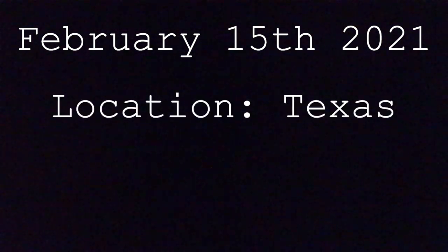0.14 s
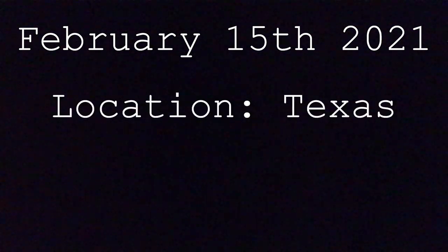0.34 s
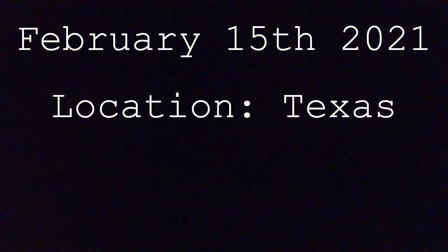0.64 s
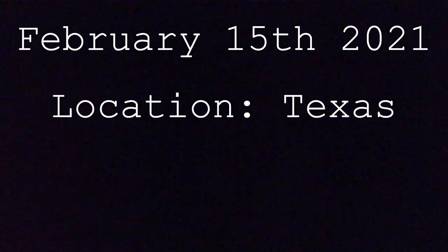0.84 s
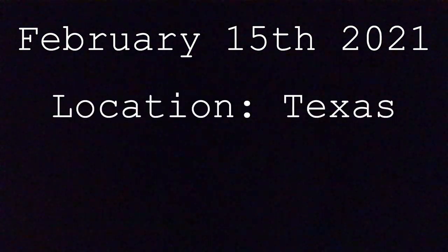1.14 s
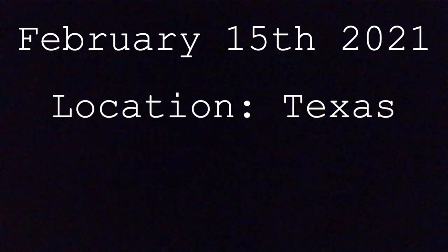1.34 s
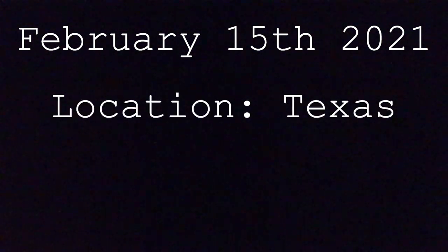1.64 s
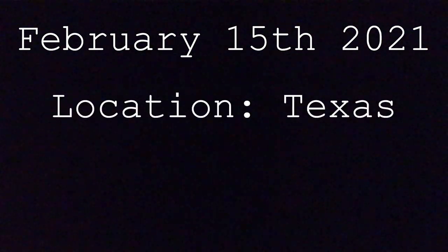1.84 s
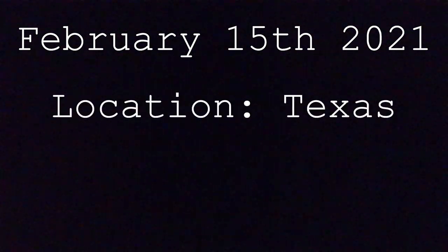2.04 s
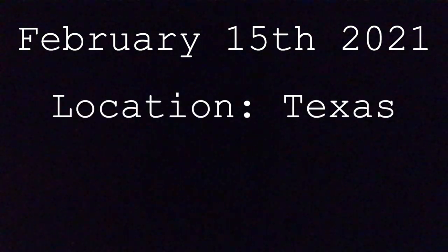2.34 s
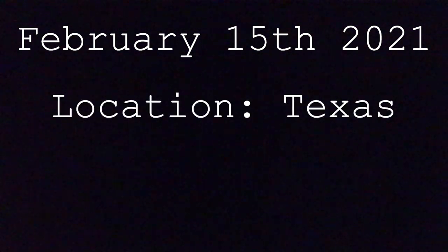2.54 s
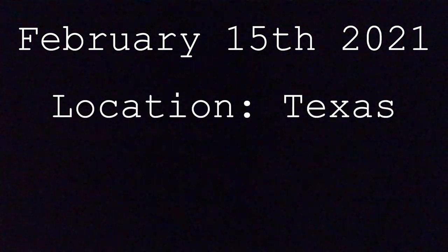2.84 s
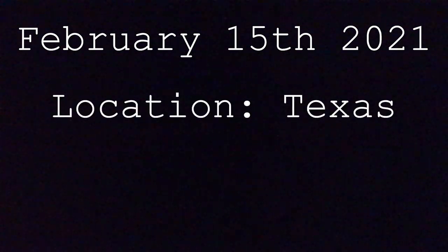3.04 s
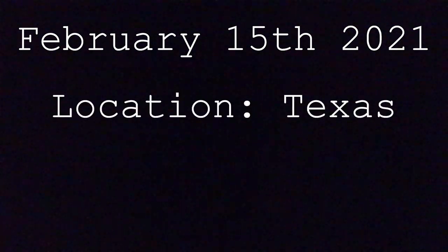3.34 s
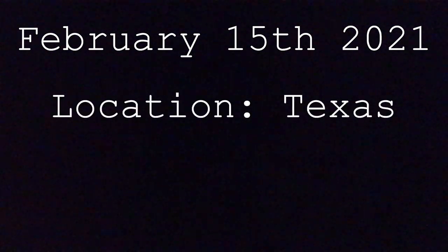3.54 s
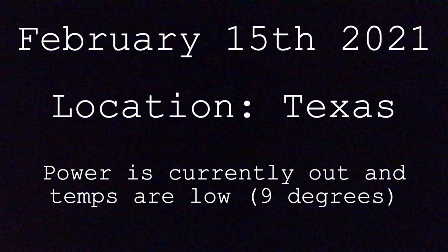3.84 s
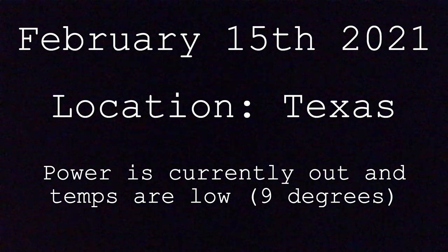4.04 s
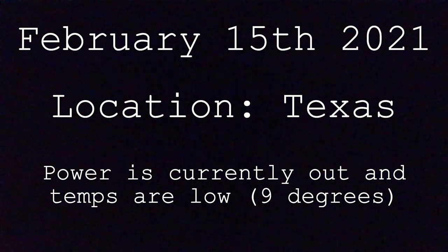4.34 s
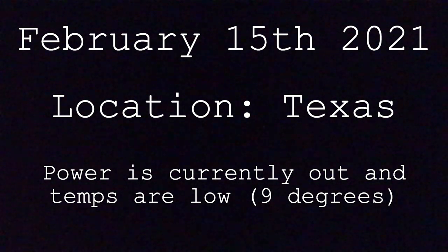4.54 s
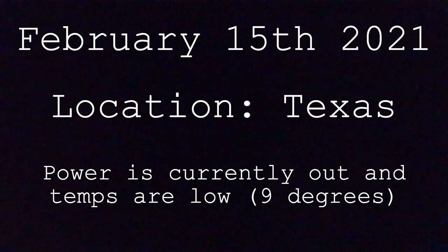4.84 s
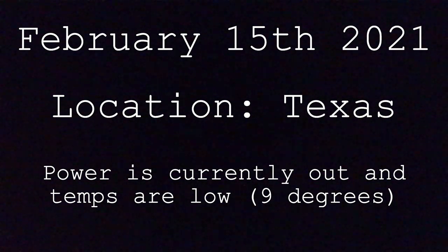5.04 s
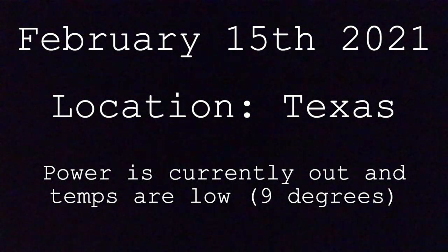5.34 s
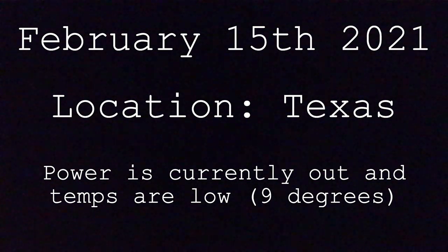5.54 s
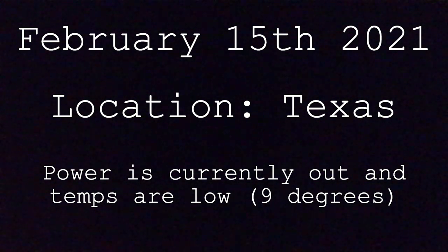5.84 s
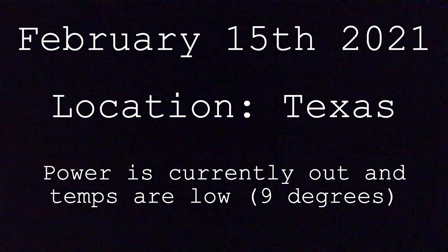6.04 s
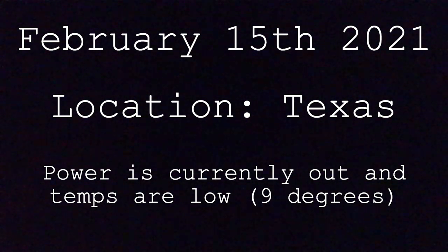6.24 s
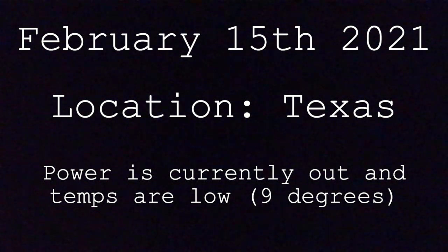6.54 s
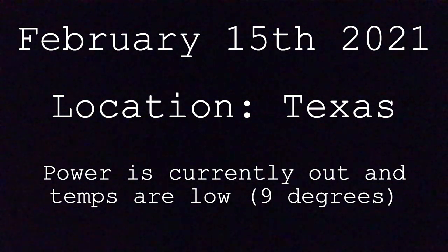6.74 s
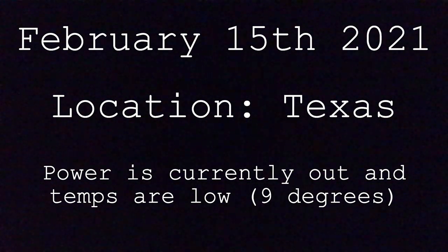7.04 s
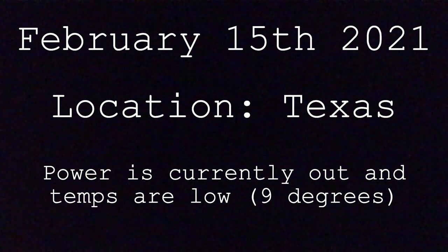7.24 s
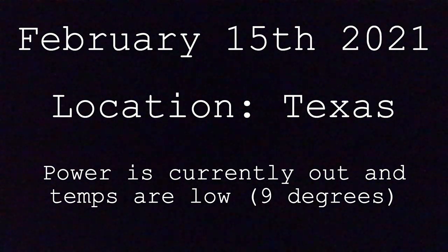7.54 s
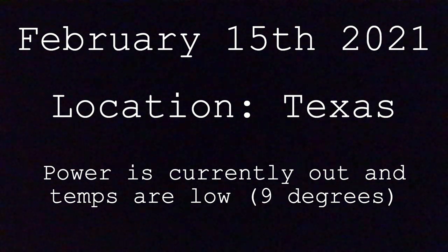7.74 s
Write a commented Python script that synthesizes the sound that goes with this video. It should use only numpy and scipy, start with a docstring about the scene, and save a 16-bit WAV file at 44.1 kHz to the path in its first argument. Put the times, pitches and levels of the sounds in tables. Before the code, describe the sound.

Something drops onto a tabletop, faint rustling and taps follow, then a match rasps four times on its box, ending with a loud knock.

```python
"""In a small quiet room something lands on a table with a thud, and a cardboard matchbox is handled.
A match is struck four times: crowds of tiny noise impacts make the head rasp and ring the box,
then the loose sticks rattle inside as sparser, more uneven crowds. Single taps are short rings of the box.
Shaped noise gives the soft rustle of hands and the faint hiss, and a diffuse echo gives the room."""
import sys
import numpy as np
from scipy import signal
from scipy.fft import rfft, irfft
from scipy.io import wavfile
from scipy.ndimage import uniform_filter1d

SR = 44100
rng = np.random.default_rng(int(sys.argv[2]) if len(sys.argv) > 2 else 0)


def materialize(psi):
    """Save the field psi as 16-bit PCM at rate SR to the path in sys.argv[1].

    A 1-D psi becomes a single channel; in a 2-D psi each row is a channel.
    """
    bounded = np.clip(np.atleast_2d(psi).T, -1, 1)
    quanta = np.round(bounded * 32767).astype(np.int16)
    wavfile.write(sys.argv[1], SR, quanta)


N = 347949
SIZE = 16384  # longest single event [samples]
FREQ = np.maximum(np.arange(SIZE // 2 + 1) * SR / SIZE, 1)  # [Hz]
TIME = np.arange(N) / SR  # [s]
TOP_HZ = 16000  # upper limit of the recorder

# colour of still air and microphone hiss, scaled later to one overall level:
# (frequency [Hz], relative level [dB])
HISS_COLOUR = [(20, -39.5), (35, -9), (55, 0.5), (110, -8), (230, -8.5), (450, -12.5), (680, -16),
               (1000, -17), (2000, -24.5), (4900, -29.5), (6200, -28.5), (10500, -36.5), (12000, -32),
               (16000, -32)]
HISS_DB = -67
# how long the room echo takes to fall by 60 dB: (frequency [Hz], decay time [s])
ROOM_DECAY = [(100, 0.12), (300, 0.6932), (1000, 0.1482), (3000, 0.29), (7000, 0.32), (15000, 0.23)]
# colour of the room echo: (frequency [Hz], relative level [dB])
ROOM_COLOUR = [(60, -0.5), (300, -9), (800, -0.5), (1600, 5), (4000, -2.5), (8000, -3), (15000, 0)]

# hands and sleeves brushing; a positive tilt lifts the bright part and lowers the dull part:
# (crest time [s], rise [s], fall [s], level [dB], tilt [dB])
BRUSHES = [(.06, .024, 0.043, -53.5, 4.5), (.1, 0.14, 0.09, -56.5, -1), (.94, .03, .025, -66.5, 1),
           (1.33, .12, 0.089, -66.5, -4.5), (1.425, 0.038, 0.086, -56, -2.5),
           (1.74, 0.094, 0.08, -59.5, 1.9), (1.96, 0.056, 0.049, -61.5, 1), (2.22, 0.063, 0.063, -60, 0.5),
           (4.43, .06, .07, -73.5, 5.5), (7.76, 0.036, .03, -68.5, -8)]
# colour of sliding skin and cloth: (frequency [Hz], relative level [dB])
CLOTH_COLOUR = [(150, -11.5), (400, -1), (700, -5.5), (1100, 2), (1700, -5), (2800, -11), (4000, -8.5),
                (5000, -12.5), (6200, -10), (10500, -19.5), (15000, -14.5)]
# a trace of cloth noise remains while the hands rest
RESTING_DB, RESTING_TILT_DB = -82.5, 1
# the sleeve swishes dully as the arm starts each stroke
SWISH_RISE_S, SWISH_FALL_S, SWISH_DB, SWISH_TILT_DB = 0.018, .03, -68, -8

# low bumps of handling: (middle time [s], length [s], level [dB], frequency [Hz])
HANDLING_BUMPS = [(.938, .058, -41.5, 136), (1.362, .026, -48.5, 105), (5.458, .035, -56, 55),
                  (7.8065, .0066, -14, 305), (7.812, 0.022, -23.5, 109), (7.837, .017, -34, 140)]
# the table top flexes slowly under every blow; its level is relative to the blow
FLEX_LAG_S, FLEX_LENGTH_S, FLEX_DB, FLEX_HZ = .009, .026, -19.5, 129
# the jerk of the hand gives a low push; its level is relative to the settling sticks
PUSH_LENGTH_S, PUSH_OVER_SETTLE_DB, PUSH_HZ = .033, -16, 70

# an object lands on the table, rocks and bounces: (time [s], level [dB], tilt [dB per octave])
THUDS = [(.6503, 1, -2.5), (0.6536, -9, -2.5), (.6615, -12, -5), (.682, -17, -2), (0.7015, -8.5, -5),
         (.719, -14, -4.5), (0.7777, -18, -5.5), (0.7899, -27, -6)]
# resonances of the table top: (frequency [Hz], width [Hz], lift over the broad colour [dB])
TABLE_MODES = [(253, 16, 3.5), (313, 7, 9.9), (413.5, 11, 4.06), (470.4, 12, 3), (620, 61, 8.6),
               (950, 40, 8), (1400, 90, 6)]
# broad colour of a blow on the table: (frequency [Hz], relative level [dB])
WOOD_COLOUR = [(30, -37.5), (80, -23.5), (140, -5.5), (300, -4), (480, -2.5), (780, -19), (1200, -18),
               (2000, -27), (3000, -28.5), (5500, -34), (8000, -40), (15500, -50)]
THUD_HZ, THUD_RING_DB, THUD_ROOM_DB = 335, 4, -15

# single taps of a stick or nail on the box:
# (time [s], level [dB], wall ring [Hz], ring lift [dB], tilt [dB per octave])
TICKS = [(1.6165, -43.5, 1502, 10, -3), (1.7545, -43.5, 1000, 7.5, -2), (2.679, -37.5, 2790, 3, 0.5),
         (2.7173, -34.5, 1300, 6.5, 1.5), (2.7337, -47, 1400, 9, 0), (3.0241, -23, 1500, 4.5, 2),
         (3.029, -19.5, 750, 4.5, 2.5), (3.0995, -38, 1600, 7, -3.5), (4.7063, -32.5, 2300, 4.5, 2),
         (4.8883, -43, 986, 6, 2), (5.0046, -33.5, 2600, 5, 1), (5.0249, -22, 1080, 5, -1.5),
         (5.3704, -12, 1690, 5, -6), (5.4075, -29, 1500, 5, 6.5), (5.4618, -30.5, 950, 5, -5),
         (5.468, -31.5, 950, 14, 3.5), (5.5143, -30, 1100, 4, 8), (5.528, -30.5, 1150, 5, -3.5),
         (5.5517, -25, 1710, 13, -1), (5.5633, -19, 5200, 6.5, 5.5), (5.581, -38, 1117, 10, -7.5),
         (5.9245, -40.5, 2700, 5, 3), (6.2099, -19, 1500, 7.5, -2.5), (6.2705, -30.5, 900, 3.5, -4.5),
         (6.3186, -27.5, 1006, 4, 1.5), (6.4155, -30.5, 1000, 7, -3), (6.426, -31.5, 1500, 11, -1.5),
         (6.438, -33.5, 1000, 3, -4), (6.5395, -31, 641, 15, 4), (6.818, -34.5, 1880, 15, 1.5),
         (7.146, -18, 950, 6.5, 0), (7.178, -11.5, 4500, 23, -1), (7.1894, -18.5, 950, 11, 2.5),
         (7.2093, -27.5, 950, 24.5, -3.5), (7.3377, -22.5, 698, 12, 6), (7.3395, -30, 700, 4, -4.5),
         (7.6303, -30.5, 1006, 4, 3.5), (7.6583, -45.5, 1000, 8, -1), (7.6855, -45, 1900, 3, 1),
         (7.8298, 0, 1200, 20.5, 7.5)]
# resonances of the cardboard box, before the fingers shift them:
# (frequency [Hz], width [Hz], lift over the broad colour [dB])
BOX_MODES = [(640, 96, 7), (927, 59, 8), (1193, 160, 4.5), (1600, 200, 2.5), (1715, 46, 7), (2300, 64, -1),
             (2740, 270, 2.5), (3420, 120, -1), (4230, 610, 5), (4694, 40, 0.5), (5920, 400, 7.5),
             (6780, 280, 5)]
# broad colour of a tap on the box: (frequency [Hz], relative level [dB])
TAP_COLOUR = [(50, -16), (250, -18), (500, -4.5), (1000, 0.5), (1800, -2.5), (3000, -5.5), (5000, -15),
              (7500, -21), (10500, -29), (15500, -27.5)]
TAP_ROOM_DB = -15

# fingers scuff the box and a few sticks slide inside:
# (crest time [s], fall [s], level [dB], wall ring [Hz], tilt [dB per octave])
SCUFFS = [(.642, 0.0083, -42, 600, -14), (.679, 0.035, -42, 1100, -3), (1.32, .01, -59, 520, -14),
          (1.355, 0.0057, -41.5, 900, -6.5), (1.374, 0.017, -34.5, 1540, 0),
          (1.79, 0.0076, -57.5, 1200, -2), (1.865, 0.0053, -58, 484, -6), (1.975, 0.0077, -59.5, 555, -7),
          (2.083, .006, -56.5, 498, -7), (2.338, .004, -61.5, 1100, -4), (2.961, .006, -54, 900, 1),
          (2.995, 0.032, -50, 1100, -1.5), (3.06, .009, -55, 800, 0), (3.155, .012, -64, 900, -0.5),
          (4.455, .022, -66, 900, -3), (4.481, 0.0028, -47, 1100, -5.5), (4.8, .012, -67.5, 800, 0),
          (4.845, .008, -61.5, 600, -8), (5.299, .012, -53.5, 1097, -3.5), (5.52, .046, -49.5, 950, -0.5),
          (5.601, .003, -46.5, 980, 2), (5.666, .005, -60, 895, -5), (5.933, .015, -44, 1027, -4),
          (6.333, 0.027, -51.5, 950, -1), (6.417, 0.0035, -44.5, 1900, -4), (6.821, 0.0068, -44, 1026, -3),
          (7.159, .006, -35.5, 880, -2.5), (7.197, 0.021, -39, 920, -2), (7.641, .013, -44.5, 980, -4),
          (7.724, 0.0056, -61, 1700, 0), (7.789, 0.0093, -30.5, 780, -4), (7.883, 0.012, -23.5, 654, -1.5)]
SCUFF_RISE_SHARE, SCUFF_RING_DB = .52, 7.5  # the rise is a share of the fall

# the loose sticks hit the box together:
# (crest time [s], fall [s], level [dB], wall ring [Hz], ring lift [dB], tilt [dB per octave])
JOLTS = [(5.3312, 0.0027, -20.5, 1750, 5.5, 0), (5.3565, .012, -18.5, 1710, 10.5, -2),
         (5.369, 0.0047, -13.5, 900, 7.5, 2), (6.126, 0.0045, -25.5, 920, 8, 6),
         (6.159, 0.0084, -19, 1600, 1.5, -.5), (6.172, .003, -22, 1120, 5.5, -.5),
         (6.1864, 0.0042, -19, 1650, 9.5, -1.5), (7.014, .0027, -23.5, 950, -0.5, 1),
         (7.028, 0.0047, -12, 1600, 0, 1.5), (7.033, 0.0051, -10.5, 620, 0, 2),
         (7.046, 0.0015, -16.5, 1090, 8.5, -3), (7.1795, .0045, -23.5, 950, 13, 1.5),
         (7.8015, 0.002, -13, 696, 22, 2.5), (7.8245, .0033, -10.5, 970, 14.5, 2),
         (7.831, .003, -8.5, 1130, 11.5, 3)]
JOLT_RISE_S = .0014
# broad colour of sticks against the box: (frequency [Hz], relative level [dB])
STICK_COLOUR = [(30, -32.5), (100, -25), (230, -22), (420, -3), (600, -5), (1100, -5), (1700, -6.5),
                (2500, -7.5), (4500, -14), (7000, -19.5), (10500, -26), (15500, -26)]
# the sticks settle after each stroke, ringing one wall of the box
SETTLE_LAG_S, SETTLE_RISE_S, SETTLE_TILT_DB = .027, .01, -0.4
BOX_WALL_HZ, BOX_WALL_DB = 920, 6

# strokes of the match; the hand's push and the sticks' settling are counted from the push time:
# (touch time [s], crest of the bite [s], push time [s], rasp level [dB], bite level [dB],
#  wall ring [Hz], ring lift [dB], settling fall [s], settling level [dB])
STRIKES = [(5.311, 5.327, 5.368, -32.5, -25, 930, 6.8, 0.05, -35.5),
           (6.0999, 6.112, 6.13, -32.5, -19, 724, 7.6, 0.045, -31.5),
           (6.972, 6.988, 7.032, -32, -16, 970, 8.9, .062, -31),
           (7.782, 7.809, 7.8, -39, -18, 563, 3.6, 0.047, -27)]
# broad colour of the head grinding on grit: (frequency [Hz], relative level [dB])
GRIT_COLOUR = [(30, -32), (100, -26), (250, -25.5), (420, -13.5), (650, -2), (1000, -1.5), (1500, -10.5),
               (2300, -9.5), (4500, -19.5), (7000, -22), (10500, -28.5), (15500, -25)]
# the head rasps brightly from the touch; tilts are in dB per octave
RASP_RISE_S, RASP_FALL_S, RASP_RING_DB, RASP_TILT_DB = .0017, 0.044, 2.5, 1.5
# the bite is duller; its rise is a share of the time from touch to the crest of the bite
BITE_RISE_SHARE, BITE_FALL_S, BITE_TILT_DB = .36, .007, -1.5
CATCH_DB = 2  # unevenness of the scrapes and rattles


def undb(db):
    """Turn decibels into gain."""
    return 10 ** (np.asarray(db) / 20)


def rms(x):
    """Root mean square, the average strength of a sound."""
    return np.sqrt(np.mean(x ** 2))


def read(points, hz):
    """Join (frequency [Hz], value) points by straight lines on a log-frequency axis."""
    f, value = np.transpose(points)
    return np.interp(np.log(np.maximum(hz, 1)), np.log(f), value)


def add(track, s, sound):
    """Mix a sound into a track from time s [s] on."""
    i = max(int(s * SR), 0)
    track[i:i + len(sound)] += sound[:max(N - i, 0)]


def swell_at(t, rise, fall):
    """Rounded rise to a crest at t = 0, then an exponential fall."""
    return np.exp(-np.where(t < 0, (t / rise) ** 2 / 2, t / abs(fall)))


def noise(points):
    """Steady noise of a given colour, rms 1."""
    gains = undb(read(points, np.arange(N // 2 + 1) * SR / N))
    x = irfft(rfft(rng.standard_normal(N)) * gains, N)
    return x / rms(x)


def response(colour, modes, tilt_db):
    """Ring of a struck body: a broad colour, tilted by the hardness of the contact, plus resonances."""
    db = read(colour, FREQ) + tilt_db * np.log2(np.maximum(FREQ, 250) / 1000)
    for hz, width, peak_db in modes:
        distance = 2 * (FREQ - hz) / width
        db = db + 10 * np.log10(1 + (undb(peak_db) ** 2 - 1) / (1 + distance ** 2))
    cepstrum = irfft(np.log(undb(db)))
    cepstrum[1:SIZE // 2] *= 2  # minimum phase: nothing sounds before the contact
    cepstrum[SIZE // 2 + 1:] = 0
    return irfft(np.exp(rfft(cepstrum)))


def held_box(grip):
    """The fingers shift the resonances of the box a little at every touch."""
    shifts = np.exp(grip * rng.standard_normal(len(BOX_MODES)))
    return [(hz * shift, width, db) for (hz, width, db), shift in zip(BOX_MODES, shifts)]


def splinters(pulses, count, ring_db, width_hz):
    """Share the impacts among a few splinters of wood; each adds a short bright note of its own."""
    owner = rng.integers(0, count, len(pulses))
    out = pulses.copy()
    steps = (np.arange(count) + rng.random(count)) / count
    for k, hz in enumerate(1200 * 8 ** steps):  # notes spread from 1200 to 9600 Hz
        b, a = signal.iirpeak(hz, hz / width_hz, fs=SR)
        out += undb(ring_db) * signal.lfilter(b, a, pulses * (owner == k))
    return out


def swarms(table, colour, per_second, scatter_db, ring_width, stick_db):
    """Swelling and fading crowds of tiny impacts, each crowd ringing the box and one wall of it."""
    out = np.zeros(N)
    t = (np.arange(SIZE) - SIZE // 3) / SR
    for s, rise, fall, db, ring_hz, ring_db, tilt_db in table:
        swell = swell_at(t, rise, fall)
        hits = rng.random(SIZE) < per_second * (.5 + swell) / SR  # impacts crowd together at the crest
        sizes = rng.choice([-1, 1], SIZE) * undb(scatter_db * rng.uniform(-1, 1, SIZE))
        # the contact catches and slips every few milliseconds
        grip = uniform_filter1d(rng.standard_normal(SIZE), size=200)
        catching = undb(CATCH_DB * grip / rms(grip))
        impacts = swell * hits * sizes * catching
        pulses = splinters(impacts, count=6, ring_db=stick_db, width_hz=200)
        wall = (ring_hz, ring_width * ring_hz, ring_db)
        body = response(colour, held_box(grip=.035) + [wall], tilt_db)
        sound = signal.fftconvolve(pulses, body)[:SIZE]
        level = undb(db) * rms(swell) / (rms(sound) + 1e-12)
        add(out, s + t[0], sound * level)
    return out


def blows(table, colour, modes, ring_width, chatter, chatter_s):
    """Single impacts on a body whose resonances modes() gives."""
    out = np.zeros(N)
    t = np.arange(SIZE // 16) / SR
    for s, db, ring_hz, ring_db, tilt_db in table:
        ring = response(colour, modes() + [(ring_hz, ring_width * ring_hz, ring_db)], tilt_db)
        # the surfaces chatter for a few milliseconds after contact, which colours every blow differently
        contact = rng.standard_normal(len(t)) * np.exp(-t / chatter_s)
        contact *= chatter / np.linalg.norm(contact)
        contact[0] = 1
        level = undb(db) / np.abs(ring).max() / np.linalg.norm(contact)
        add(out, s, signal.fftconvolve(ring, contact) * level)
    return out


def hiss():
    """Still air and microphone hiss: steady coloured noise."""
    return undb(HISS_DB) * noise(HISS_COLOUR)


def room(x, first_s, build_s):
    """Diffuse echo of near walls: it builds after the first reflection and each pitch band dies at its own rate."""
    t = np.arange(2 * SIZE) / SR
    hz = np.arange(SIZE + 1) * SR / (2 * SIZE)
    spectrum = rfft(rng.standard_normal(2 * SIZE)) * undb(read(ROOM_COLOUR, hz))
    tail = 0
    for centre in 2. ** np.arange(6, 15):  # octave bands from 64 to 16384 Hz
        band = np.maximum(1 - np.abs(np.log2(np.maximum(hz, 1) / centre)), 0)
        decay = np.exp(-np.log(1000) * t / read(ROOM_DECAY, centre))
        tail = tail + irfft(spectrum * band) * decay
    tail = tail * np.clip((t - first_s) / build_s, 0, 1)
    return signal.fftconvolve(x, tail / np.sqrt(np.sum(tail ** 2)))[:N]


def rustle(grain_db):
    """Skin and cloth sliding: a fine uneven hiss that swells and fades, each brush with its own brightness."""
    rub = noise(CLOTH_COLOUR)
    low = signal.sosfilt(signal.butter(1, 2500, fs=SR, output="sos"), rub)
    dull, bright = undb(RESTING_DB - RESTING_TILT_DB), undb(RESTING_DB + RESTING_TILT_DB)
    swishes = [(touch, SWISH_RISE_S, SWISH_FALL_S, SWISH_DB, SWISH_TILT_DB) for touch, *_ in STRIKES]
    for s, rise, fall, db, tilt_db in BRUSHES + swishes:
        swell = swell_at(TIME - s, rise, fall)
        dull = np.hypot(dull, swell * undb(db - tilt_db))
        bright = np.hypot(bright, swell * undb(db + tilt_db))
    grain = uniform_filter1d(rng.standard_normal(N), size=130)
    return (low * dull + (rub - low) * bright) * undb(grain_db * grain / rms(grain))


def bumps():
    """Soft pushes from the hands and the flexing table: slow swings that swell and stop."""
    flexes = [(s + FLEX_LAG_S, FLEX_LENGTH_S, db + FLEX_DB, FLEX_HZ) for s, db, _ in THUDS]
    pushes = [(push, PUSH_LENGTH_S, db + PUSH_OVER_SETTLE_DB, PUSH_HZ) for _, _, push, *_, db in STRIKES]
    out = np.zeros(N)
    for s, length, db, hz in HANDLING_BUMPS + flexes + pushes:
        t = np.arange(-length / 2, length / 2, 1 / SR)
        swell = np.cos(np.pi * t / length) ** 2
        add(out, s + t[0], undb(db) * swell * np.sin(2 * np.pi * hz * t))
    return out


def thuds():
    """Dull blows that all ring the same table top."""
    rows = [(s, db, THUD_HZ, THUD_RING_DB, tilt_db) for s, db, tilt_db in THUDS]
    return blows(rows, WOOD_COLOUR, lambda: TABLE_MODES, ring_width=.24, chatter=.6, chatter_s=.0083)


def ticks():
    """Single taps, each on a box that is held a little differently."""
    return blows(TICKS, TAP_COLOUR, lambda: held_box(grip=.06), ring_width=.3, chatter=.88, chatter_s=.0033)


def scuffs():
    """Fingers shift on the box; a longer scuff also starts more slowly."""
    rows = [(s, SCUFF_RISE_SHARE * fall, fall, db, hz, SCUFF_RING_DB, tilt_db)
            for s, fall, db, hz, tilt_db in SCUFFS]
    return swarms(rows, STICK_COLOUR, per_second=1400, scatter_db=8.5, ring_width=.18, stick_db=7)


def loose_sticks():
    """Each stroke throws the sticks against the box, and they tumble to rest."""
    jolts = [(s, JOLT_RISE_S, *rest) for s, *rest in JOLTS]
    settling = [(push + SETTLE_LAG_S, SETTLE_RISE_S, fall, db, BOX_WALL_HZ, BOX_WALL_DB, SETTLE_TILT_DB)
                for _, _, push, *_, fall, db in STRIKES]
    thrown = swarms(jolts, STICK_COLOUR, per_second=2400, scatter_db=7, ring_width=0.13, stick_db=7.0)
    tumbling = swarms(settling, STICK_COLOUR, per_second=700, scatter_db=9, ring_width=0.15, stick_db=7.5)
    return thrown + tumbling


def match_head():
    """The head rasps from the moment it touches the strip and bites harder a little later."""
    rows = []
    for touch, bite, _, rasp_db, bite_db, hz, ring_db, *_ in STRIKES:
        rasp_crest = touch + 2 * RASP_RISE_S
        rows.append((rasp_crest, RASP_RISE_S, RASP_FALL_S, rasp_db, hz, RASP_RING_DB, RASP_TILT_DB))
        bite_rise = BITE_RISE_SHARE * (bite - touch)
        rows.append((bite, bite_rise, BITE_FALL_S, bite_db, hz, ring_db, BITE_TILT_DB))
    return swarms(rows, GRIT_COLOUR, per_second=7000, scatter_db=5.5, ring_width=0.1, stick_db=5.5)


def scene():
    """All sources close to the microphone, with the echo of the blows, scrapes and rattles behind them."""
    landing = thuds()
    taps = ticks()
    rattle = scuffs() + loose_sticks()
    head = match_head()
    to_room = undb(-8.0) * head + undb(-14.0) * rattle + undb(TAP_ROOM_DB) * taps + undb(THUD_ROOM_DB) * landing
    echo = room(to_room, first_s=.0033, build_s=0.0089)
    background = hiss() + echo + rustle(grain_db=1.5) + bumps()
    return (background + landing + taps + rattle + head)[None]


def record(dry):
    """The recorder clips at full scale and then cuts the highest treble."""
    low_pass = signal.ellip(10, .2, 80, TOP_HZ, fs=SR, output="sos")
    return signal.sosfilt(low_pass, np.clip(dry, -1, 1))


dry = scene()
out = record(dry)
materialize(out)
```